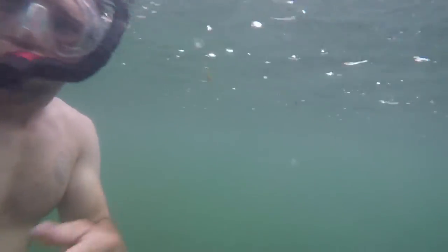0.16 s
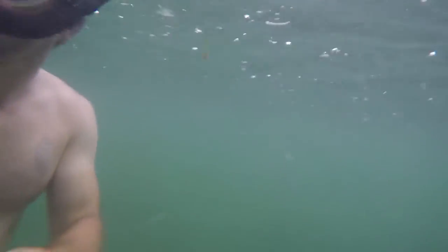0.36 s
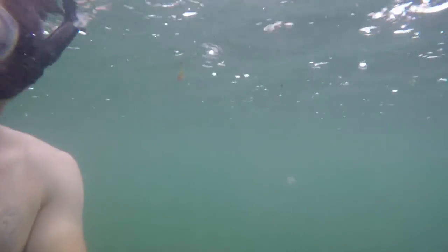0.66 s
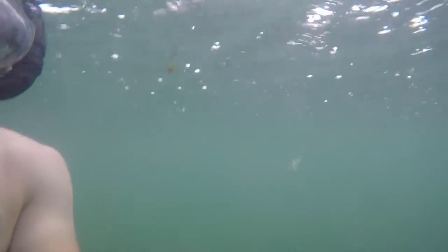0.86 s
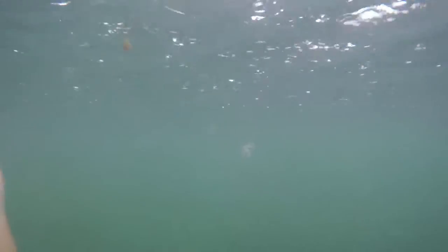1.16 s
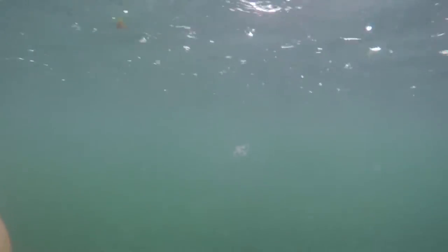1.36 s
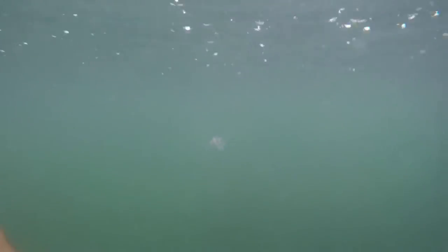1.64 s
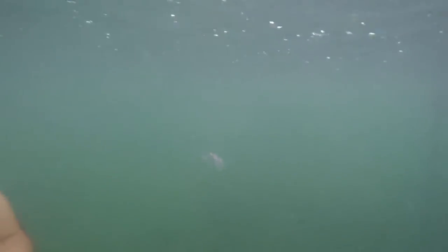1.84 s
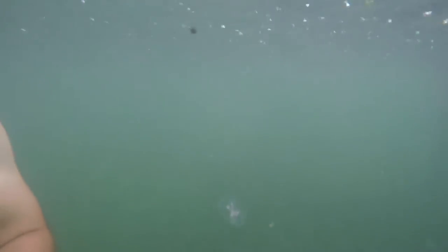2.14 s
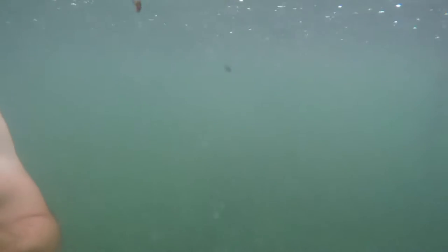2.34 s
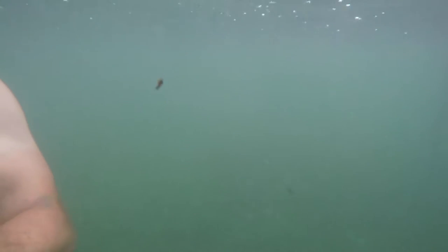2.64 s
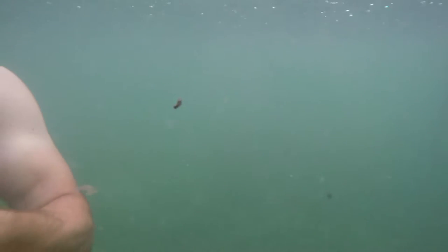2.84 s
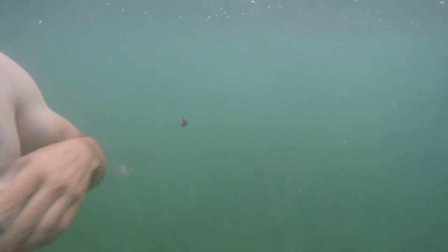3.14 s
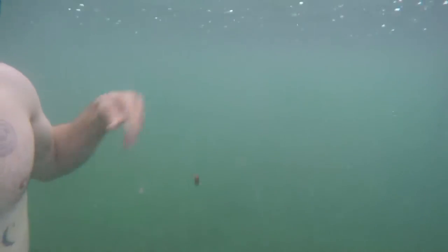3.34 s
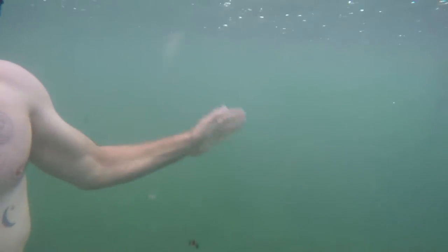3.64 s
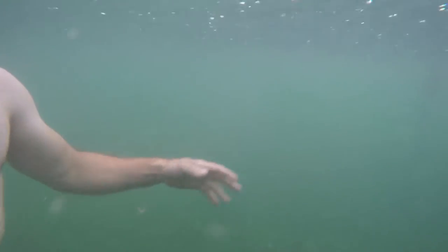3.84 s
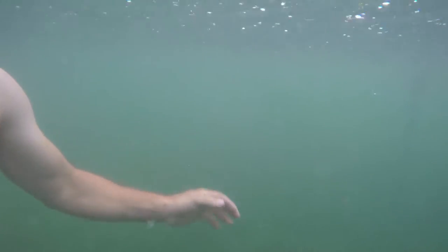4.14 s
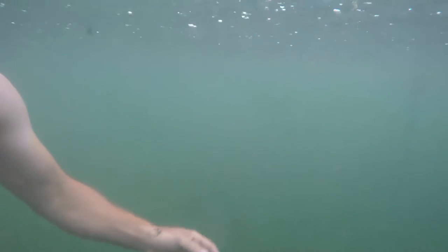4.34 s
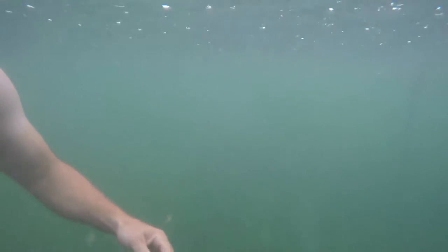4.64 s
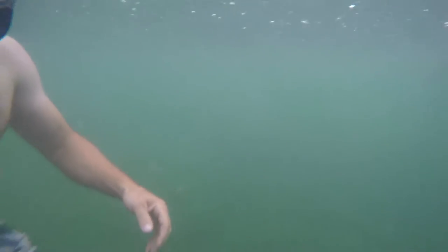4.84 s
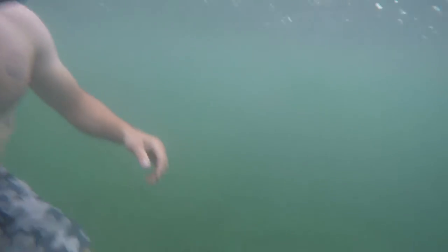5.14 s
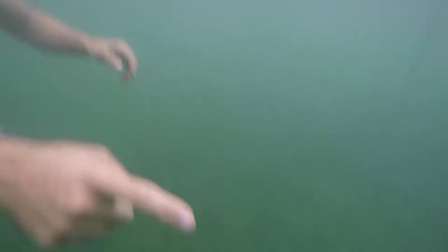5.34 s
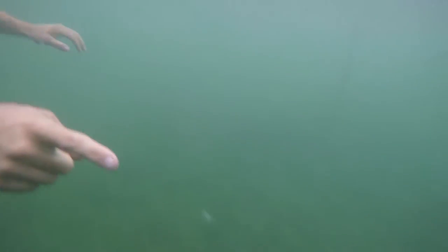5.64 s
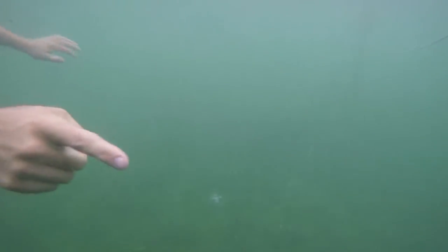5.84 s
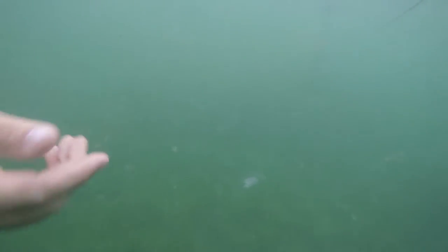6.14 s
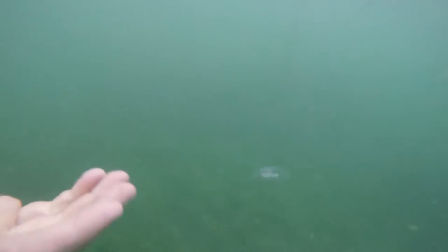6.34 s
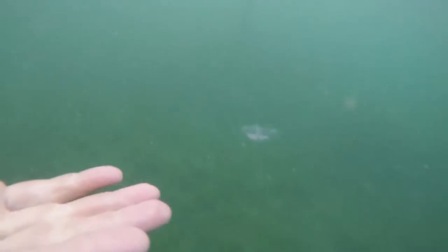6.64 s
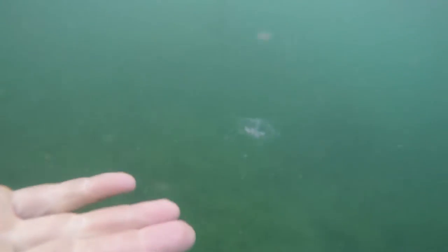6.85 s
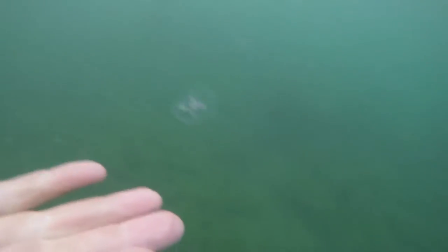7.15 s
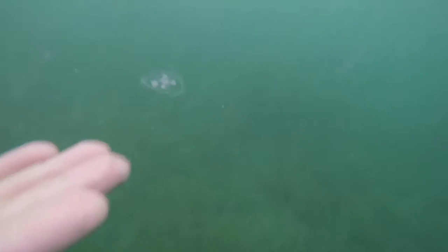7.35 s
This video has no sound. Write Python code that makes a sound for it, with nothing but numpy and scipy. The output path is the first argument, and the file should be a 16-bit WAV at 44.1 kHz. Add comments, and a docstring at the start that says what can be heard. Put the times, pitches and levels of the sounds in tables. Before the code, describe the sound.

Low, muffled churning and a hollow wash surround a microphone in a plastic housing held underwater in a lake. Air pockets glug close by, small bubbles tick and snap, and jolts thump the case while fingers briefly rub it. A soft burst of fizz from a swimming stroke comes about halfway through. The strongest glugs bunch together near the end, followed by a short burble and quieter water.

```python
"""Just under the surface of a lake, a swimmer carries a camera in a sealed housing.
Water heaves and churns against the case, and washes and hisses through its resonances.
Fingers rub the plastic, small bubbles tick, and one arm stroke leaves a cloud of fizz.
Up front, jolts thump the case and air pockets glug and set it ringing."""
import sys
import numpy as np
from scipy import signal
from scipy.fft import rfft, irfft
from scipy.io import wavfile
from scipy.ndimage import uniform_filter1d

SR = 44100
rng = np.random.default_rng(int(sys.argv[2]) if len(sys.argv) > 2 else 0)


def put_to_file(sound):
    """Save the sound as 16-bit audio at rate SR, in the file named by the first command-line argument."""
    columns = np.atleast_2d(sound).T  # one column per channel
    safe = np.clip(columns, -1, 1)
    whole_steps = np.round(safe * 32767)
    wavfile.write(sys.argv[1], SR, whole_steps.astype(np.int16))


N = 330309
T = np.arange(N) / SR

# tone of the microphone's noise floor: (frequency [Hz], gain [dB])
MIC_EQ = [(3530, -54), (6000, 0), (9350, -1), (11400, -4), (12700, -4), (15200, -5.5)]
# motion of the case through the water: (time [s], heave level [dB], churn level [dB])
MOTION_LEVELS = [(0, -40, -52), (.3, -40, -49), (.45, -30.5, -49), (.8, -37.5, -47.5), (1.15, -40.5, -50.5),
                 (1.42, -33, -46), (1.7, -38.5, -51.5), (2.1, -44, -48.5), (2.5, -43.5, -46),
                 (3.1, -46, -47.5), (3.4, -44.5, -46.5), (3.7, -42, -42), (4.1, -43, -46),
                 (4.8, -40.5, -48.5), (5.15, -37, -50), (5.4, -31.5, -45.5), (5.65, -35, -48.5),
                 (5.82, -33, -46), (6.1, -38.5, -46.5), (6.5, -41, -54.5), (7.0, -37.5, -53),
                 (7.36, -39, -55), (7.45, -39, -46), (7.49, -39, -45)]
# water bed around the case: (time [s], wash level [dB], hiss level [dB])
BED_LEVELS = [(0.0, -46, -57), (0.27, -48, -57), (0.69, -44.5, -54.5), (0.85, -43, -53.5), (1.06, -46, -56),
              (2.77, -47.5, -56.5), (3.32, -48.5, -55), (3.65, -46.5, -55.5), (4.01, -40, -55.5),
              (4.71, -48, -55.5), (5.63, -45, -54.5), (5.84, -42, -55), (6.26, -44.5, -55),
              (7.11, -46, -56), (7.49, -45, -55.5)]
# low rumble of the eddies: (frequency [Hz], gain [dB])
CHURN_EQ = [(32, -31), (55, -2.5), (86, -7.5), (118, -8.5), (221, -16), (260, -13), (340, -61), (570, -120)]
# hollow midrange of the case: (frequency [Hz], gain [dB])
WASH_EQ = [(120, -42.5), (200, -26), (253, -22), (291, -7.5), (377, -10), (603, -0.5), (794, -13.5),
           (928, -19.5), (1110, -28.5), (1300, -32), (1690, -73), (2860, -120)]
# bright resonances of the case wall: (frequency [Hz], gain [dB])
WALL_EQ = [(760, -38.5), (1300, -15), (1460, -9), (1660, 3.5), (2030, -3.5), (2400, -3.5), (2610, -0.5),
           (2940, -1.5), (3460, -3), (3770, -4.5), (4040, -1.5), (4590, -13.5), (5210, -10.5), (5750, -18),
           (7000, -29), (9100, -34), (15400, -120)]
# fingers on the plastic: (start [s], peak [s], end [s], level [dB], share of glide [0-1])
FINGER_RUBS = [(0.308, 0.331, 0.34, -46.5, 0.3), (.415, 0.415, 0.48, -50.5, 0.3),
               (0.544, 0.565, 0.59, -31.5, 0), (.6, 0.626, 0.64, -48, 0.6), (1.428, 1.46, 1.5, -53.5, 0.5),
               (1.777, 1.805, 1.7, -55, 0.2), (5.28, 5.405, 5.415, -44, 0.94),
               (5.525, 5.533, 5.85, -57, 0.3), (5.763, 5.764, 6.1, -60, 0.15)]
# harsh finger scrape: (frequency [Hz], gain [dB])
SCRAPE_EQ = [(350, -40), (600, -13), (791, 2), (915, -12), (1220, -12.5), (1790, -5), (2630, -12.5),
             (2960, -15), (4330, -10.5), (6520, -27.5), (14000, -38)]
# hollow finger glide: (frequency [Hz], gain [dB])
GLIDE_EQ = [(590, -38), (1000, -10), (1110, -8), (1550, 1), (1910, -7), (2280, -3), (2560, -9.5),
            (3640, -2), (4010, -8), (5840, -13.5), (6800, -31), (8840, -58), (15000, -120)]
# sparkle of the bubble cloud: (frequency [Hz], gain [dB])
FIZZ_EQ = [(650, -45), (1100, -14), (1350, -13), (1650, 3), (1780, -4), (2340, -25), (2660, -5),
           (3150, -13), (3870, 3), (4890, -7), (5240, -1), (6010, -20), (7320, -18), (8000, -16.5),
           (11500, -33), (15000, -67), (22000, -120)]
# thin treble snaps: (time [s], spit peak [dB], pitch [Hz], top edge relative to spit [dB])
TREBLE_SNAPS = [(1.0066, -43, 5230, -17), (1.055, -37, 5370, -2), (1.1494, -56, 5430, -8),
                (2.3695, -46, 5220, -11), (2.4604, -58, 5260, 11), (2.5684, -35, 4970, -14),
                (3.0704, -48, 5100, -15), (3.077, -46, 7810, -13), (3.2737, -41, 5030, 1),
                (3.3228, -46, 7450, -11), (3.4116, -45, 5020, -5), (3.4426, -49, 5400, 2),
                (3.4764, -51, 7170, 4), (3.689, -45.5, 8410, -10), (3.6965, -41, 5620, -25),
                (3.836, -39, 5280, -14), (3.9214, -41, 4820, -3), (4.376, -43, 4980, -8),
                (4.5244, -44.5, 4900, 2), (4.6494, -50, 5000, -8), (5.029, -50, 5100, -15),
                (5.2719, -52, 4980, -22), (5.5443, -52, 6270, -19), (5.6231, -48, 5060, -16),
                (5.7882, -50, 4500, -15), (5.8013, -33.5, 4740, -24), (5.893, -42.5, 7600, -25),
                (5.913, -36, 4900, -19), (5.9214, -35, 5200, -8), (5.9494, -58, 5420, 0),
                (6.1, -40, 5170, -18), (6.2607, -48, 5110, -16), (6.4194, -48, 5200, -6),
                (7.0306, -43, 5070, -27)]
# small bubbles: (time [s], peak [dB], pitch [Hz], t60 [s])
BUBBLE_TICKS = [(0.416, -36, 1300, 0.0084), (0.427, -41, 1430, 0.012), (0.4399, -38.5, 2470, 0.022),
                (0.505, -40, 4010, 0.015), (0.559, -27, 2020, 0.014), (0.5672, -30, 2010, 0.017),
                (0.858, -32.5, 3840, 0.014), (1.0071, -41, 1900, 0.011), (1.056, -38.5, 2760, 0.0079),
                (1.4341, -42.5, 2780, 0.015), (1.8961, -42, 4300, 0.015), (2.5455, -39, 3770, 0.011),
                (2.5685, -44, 1720, 0.036), (3.2735, -34.5, 3880, 0.0076), (3.5788, -32.5, 3960, 0.015),
                (3.689, -40, 3460, 0.014), (3.6965, -38.5, 4000, 0.012), (3.922, -32, 4140, 0.017),
                (4.1659, -31.5, 1750, 0.019), (4.3085, -43, 2830, 0.015), (4.4277, -31.5, 3050, 0.011),
                (5.05, -44, 2600, 0.012), (5.178, -32, 1560, 0.0045), (5.271, -43, 4510, 0.013),
                (5.5164, -35.5, 1610, 0.06), (5.6062, -43, 2400, 0.016), (5.667, -37, 2550, 0.017),
                (5.7628, -39, 1650, 0.0089), (5.802, -41, 1780, 0.015), (5.8656, -41.5, 1640, 0.015),
                (5.91, -39, 1700, 0.03), (6.013, -36, 1700, 0.019), (6.0698, -39, 1860, 0.031),
                (6.1911, -32, 3460, 0.022), (6.409, -42.5, 2580, 0.025), (6.726, -32.5, 3180, 0.0087),
                (6.811, -44, 2900, 0.015), (7.031, -34.5, 4720, 0.0047)]
# dry raps on the wall: (time [s], peak [dB])
WALL_RAPS = [(.416, -37), (1.007, -35), (1.055, -33), (2.5686, -21.5), (3.077, -34), (3.273, -33),
             (3.689, -38), (4.376, -34), (4.427, -38), (4.88, -39), (5.177, -37), (5.788, -42),
             (6.191, -40), (6.725, -36)]
# harmonics of fluttering air: (multiple of the flutter rate, peak [dB])
BURBLE_HARMONICS = [(2, -34.5), (3, -29.5), (4, -25.5)]
# jolts of the case: (time [s], peak [dB], pitch [Hz], t60 [s])
CASE_JOLTS = [(0.299, -24, 25.5, 0.2), (0.407, -22, 35, 0.18), (.562, -18, 29.7, 0.024),
              (0.701, -26.5, 44, 0.089), (0.904, -29, 28.2, 0.15), (1.235, -27, 30, 0.028),
              (1.366, -19.5, 42, 0.075), (1.412, -33, 70, .04), (1.469, -19.5, 36, .08),
              (1.57, -27, 26, 0.27), (5.297, -25, 28.8, 0.09), (5.419, -22, 26, 0.16),
              (5.605, -28.5, 26.4, 0.16), (5.786, -26, 88.4, 0.081), (5.872, -23, 35, 0.039),
              (7.42, -34.5, 108, 0.098), (7.441, -38.5, 170, 0.1)]
# lower and upper ring of the case: (pitch [Hz], t60 [s], rise [cycles])
CASE_RINGS = [(582.6, 0.029, 0.4), (880, 0.019, 0.61)]
# air pockets and knocks, with the case's rings relative to each peak:
# (time [s], peak [dB], pitch [Hz], t60 [s], lower ring [dB], upper ring [dB])
AIR_GLUGS = [(0.037, -31, 464, 0.1, -10, -24), (0.059, -37, 447, 0.071, 5.5, -24),
             (0.3, -30.5, 596, 0.06, -4, -13), (0.615, -21.5, 596, 0.04, 0.5, -24),
             (0.74, -33, 632, 0.046, -3, -19), (1.366, -30, 540, 0.018, -8, -27),
             (1.419, -34, 620, 0.051, -5, -25), (1.521, -25, 555, 0.05, -9, -33),
             (1.549, -29.5, 556, 0.05, -8, -30), (1.804, -24, 576, 0.031, -5, -22),
             (2.021, -33.5, 610, 0.043, 2, -24), (2.566, -34, 620, 0.02, -8, -5),
             (2.647, -34, 590, 0.054, -13, -25), (2.954, -23.5, 292, 0.033, -24, -33),
             (3.014, -30, 562, 0.029, -6, -23), (3.063, -27.5, 533, 0.021, -11, -27),
             (3.28, -36.5, 490, 0.044, -8, -24), (3.325, -22.5, 285, 0.033, -19, -24),
             (3.412, -23.5, 270, 0.014, -6.5, -31), (3.472, -17.5, 558, 0.011, -11, -11.5),
             (3.515, -25.5, 556, 0.028, -2, -29), (3.559, -33, 351, 0.04, -21, -27),
             (3.62, -36.5, 362, 0.06, -8, -25), (3.702, -14, 507, 0.019, -3, -37),
             (3.943, -26, 580, 0.079, -6, -29), (4.005, -19.5, 580, 0.021, -11, -18),
             (4.02, -26.5, 375, 0.031, -18, -33), (4.163, -36.5, 553, 0.031, -5, -20),
             (4.308, -30, 675, 0.038, 1.5, -27), (4.375, -25, 516, 0.019, -6.5, -28),
             (4.45, -26.5, 577, 0.034, -11.5, -32), (4.516, -27.5, 492, 0.032, -14, -36),
             (4.58, -33, 600, 0.057, -7, -28), (4.879, -28.5, 530, 0.022, -8, -29),
             (5.176, -25.5, 580, 0.027, -7.5, -20), (5.36, -25, 374, 0.058, -9.5, -29),
             (5.427, -20, 320, 0.032, -6, -34), (5.503, -17.5, 338, 0.027, -21, -28),
             (5.516, -23.5, 664, 0.072, -9, -31), (5.595, -22, 337, 0.037, -4.5, -33),
             (5.669, -34, 620, 0.019, -1, -27), (5.679, -27.5, 335, 0.036, -11, -25),
             (5.791, -21, 592, 0.032, -19, -35), (5.802, -26, 554, 0.022, -13, -28),
             (5.842, -30, 410, 0.032, -15, -4), (5.861, -16, 328, 0.013, -5.5, -38),
             (5.89, -27, 274, 0.055, -3, -20), (5.912, -29.5, 260, 0.043, -19, -11),
             (5.954, -20, 574, 0.02, -2, -22), (6.001, -11.5, 574, 0.034, -5.5, -33),
             (6.012, -14.5, 535, 0.025, -8.5, -26), (6.068, -35, 576, 0.028, -12, -24),
             (6.098, -34.5, 267, 0.12, -14, -25), (6.26, -33, 456, 0.06, -16, -17)]


def undb(db):
    """Decibels to gain."""
    return 10 ** (np.asarray(db) / 20)


def level(x, db):
    """Set the rms level."""
    return x * undb(db) / np.sqrt(np.mean(x ** 2))


def add(out, start, x):
    """Mix a sound in at a time in seconds."""
    i = int(start * SR)
    out[i:i + len(x)] += x[:N - i]


def faders(table):
    """One fader ride per level column, in straight lines over time."""
    times, *columns = np.transpose(table)
    return (np.interp(T, times, column) for column in columns)


def band(x, lo_hz, hi_hz):
    """Gentle band-pass."""
    return signal.sosfilt(signal.butter(2, [lo_hz, hi_hz], "band", fs=SR, output="sos"), x)


def eq(x, table):
    """Minimum-phase EQ through (Hz, dB) points: it rings only after a hit."""
    hz, db = np.transpose(table)
    bins_hz = np.arange(4097) * SR / 8192
    curve_db = np.interp(np.log(bins_hz + 1), np.log(hz), db)
    cepstrum = irfft(curve_db * np.log(10) / 20)
    cepstrum[1:4096] *= 2  # fold onto positive time
    cepstrum[4097:] = 0
    return signal.fftconvolve(x, irfft(np.exp(rfft(cepstrum))))[:N]


def wobble(rate):
    """Random drift to a new value rate times a second; spread near 1."""
    hold = int(SR / rate)
    steps = np.repeat(rng.standard_normal(N // hold + 1), hold)
    return uniform_filter1d(steps, hold)[:N]


def specks(per_s, spread_db):
    """Scattered impulses, mostly small, a few large."""
    hits = rng.random(N) < per_s / SR
    return hits * rng.standard_normal(N) * undb(spread_db * rng.exponential(size=N))


def ring(hz, t60, rise_cycles, climb=0):
    """A damped tone of peak 1 that swells in; climb bends its pitch up."""
    t = T[:int(t60 * SR) + 64]
    attack = (1 - np.exp(-t * hz / rise_cycles)) ** 2
    tone = np.sin(2 * np.pi * hz * t * (1 + climb * t / t60)) * attack * undb(-60 * t / t60)
    return tone / np.max(np.abs(tone))


def spit(grit, hz, octaves, t60):
    """A dying burst of noise around a pitch, peak 1."""
    burst = grit * undb(-60 * T[:len(grit)] / t60)
    burst = band(burst, hz / 2 ** octaves, min(hz * 2 ** octaves, .45 * SR))
    return burst / np.max(np.abs(burst))


def bubbles(lo_hz, hi_hz, per_s, cycles, spread_db):
    """A swarm in 16 sizes; each size pops per_s times a second and rings at its own pitch."""
    swarm = 0
    for hz in np.geomspace(lo_hz, hi_hz, 16) * (1 + 0.026 * rng.standard_normal(16)):
        pole = np.exp((2j * np.pi - np.log(1000) / cycles) * hz / SR)
        pings = signal.lfilter([1], [1, -pole], specks(per_s, spread_db)).imag
        swarm += level(pings, 0) * np.sqrt(hz)
    return swarm


def mic_noise():
    """The microphone's own faint, airy hiss."""
    return level(eq(rng.standard_normal(N), MIC_EQ), -68.5)


def water():
    """The bed: heave and churn press on the case; wash and hiss come through its resonances."""
    heave_db, churn_db = faders(MOTION_LEVELS)
    wash_db, hiss_db = faders(BED_LEVELS)
    heave_db += 2.5 * wobble(14)
    churn_db += 1.96 * wobble(16)
    heave = band(rng.standard_normal(N), 21.5, 40.7)
    heave /= np.sqrt(uniform_filter1d(heave ** 2, size=4000))  # a steady swing whose period wanders
    # eddies and their small slaps drive churn and wash together
    eddies = rng.standard_normal(N) * undb(2.44 * wobble(22))
    slaps = specks(per_s=90, spread_db=1.84) * undb(0.41 * churn_db)
    eddies += level(slaps, -2.65)
    gurgle = eddies + level(bubbles(229, 1110, per_s=20, cycles=18, spread_db=1.3), -21)
    tinkle = level(bubbles(1458, 5610, per_s=60, cycles=61, spread_db=2.15), -9)
    hiss = tinkle + rng.standard_normal(N) * undb(1.87 * wobble(30))
    return (level(heave, heave_db) + level(eq(eddies, CHURN_EQ), churn_db)
            + level(eq(gurgle, WASH_EQ), wash_db) + level(eq(hiss, WALL_EQ), hiss_db))


def crackle():
    """Tiny bubbles pop faintly at the top of the bed."""
    return level(bubbles(4500, 13000, per_s=1.5, cycles=14, spread_db=2.5), -79.5)


def rubs():
    """Fingers stick and slip on plastic: dense grit, blended between scrape and glide."""
    grit = rng.standard_normal(N) * undb(3.1 * wobble(900))
    scrape, glide = (level(eq(grit, table), 0) for table in (SCRAPE_EQ, GLIDE_EQ))
    out = np.zeros(N)
    for start, peak, end, db, share in FINGER_RUBS:
        pressure = np.interp(T, [start, peak, end], [0, 1, 0]) ** 1.06
        out += undb(db) * pressure * (np.sqrt(1 - share) * scrape + np.sqrt(share) * glide)
    return out


def whistle(start, hz=5330, half_width_hz=110, t60=0.1):
    """Air squeezes through a narrow gap in a short, breathy whistle."""
    air = band(rng.standard_normal(N), hz - half_width_hz, hz + half_width_hz)
    return level(air, -49) * (T > start) * undb(-60 * np.maximum(T - start, 0) / t60)


def fizz(start, rise_s=0.032, fade_db_per_s=64):
    """The arm stroke's cloud of fine bubbles bursts in and fades."""
    cloud = level(bubbles(1480, 9900, per_s=150, cycles=90, spread_db=1.5), -6)
    cloud += rng.standard_normal(N)
    age = T - start
    swell = np.clip(age / rise_s, 0, 1) * undb(-fade_db_per_s * np.maximum(age - rise_s, 0))
    return level(eq(cloud, FIZZ_EQ), -43) * swell


def snaps():
    """Thin treble snaps: a spit of noise with a ping inside and a crisp top edge."""
    out = np.zeros(N)
    for start, db, hz, top_db in TREBLE_SNAPS:
        grit = rng.standard_normal(400)
        add(out, start, undb(db) * spit(grit, hz, octaves=0.44, t60=0.0059))
        add(out, start, undb(db - 4.5) * ring(hz, t60=0.011, rise_cycles=0.9))
        add(out, start, undb(db + top_db) * spit(grit, 13300, octaves=0.29, t60=0.0064))
    return out


def ticks():
    """Small bubbles ring briefly, each with a noisy edge."""
    out = np.zeros(N)
    for start, db, hz, t60 in BUBBLE_TICKS:
        edge = spit(rng.standard_normal(400), 1.01 * hz, octaves=0.3, t60=0.015)
        add(out, start, undb(db) * ring(hz, t60, rise_cycles=0.98, climb=0.013))
        add(out, start, undb(db - 8) * edge)
    return out


def raps():
    """The wall answers a dry click with its bright resonances."""
    out = np.zeros(N)
    rap = eq(signal.unit_impulse(N), WALL_EQ)[:2000]
    for start, db in WALL_RAPS:
        add(out, start, undb(db) * rap / np.max(np.abs(rap)))
    return out


def burble(start, flutter_hz=148, t60=0.15):
    """Air flutters out of a gap, its harmonics bending upward."""
    out = np.zeros(N)
    for multiple, db in BURBLE_HARMONICS:
        add(out, start, undb(db) * ring(multiple * flutter_hz, t60, rise_cycles=1, climb=0.062))
    return out


def thumps():
    """Each jolt swings the case in a deep, damped thump."""
    out = np.zeros(N)
    for start, db, hz, t60 in CASE_JOLTS:
        add(out, start, -undb(db) * ring(hz, t60, rise_cycles=0.4))
    return out


def glugs():
    """Air pockets pulse with a rising pitch and set the case ringing."""
    out = np.zeros(N)
    for start, db, hz, t60, *rings_db in AIR_GLUGS:
        add(out, start, -undb(db) * ring(hz, t60, rise_cycles=0.36, climb=0.067))
        for ring_db, mode in zip(rings_db, CASE_RINGS):
            add(out, start, undb(db + ring_db) * ring(*mode))
    return out


def scene():
    """Mono mix of bed, close detail, arm stroke and the hits up front."""
    stroke_s = 3.826
    bed = mic_noise() + water()
    detail = ticks() + snaps() + crackle() + rubs() + raps()
    stroke = fizz(stroke_s) + whistle(stroke_s)
    return (bed + detail + stroke + burble(start=6.208) + thumps() + glugs())[None]


def record(dry):
    """The camera cuts the top with a steep low-pass."""
    top_hz = 15300
    return signal.sosfilt(signal.ellip(10, .2, 60, top_hz, fs=SR, output="sos"), dry)


dry = scene()
out = record(dry)
put_to_file(out)
```